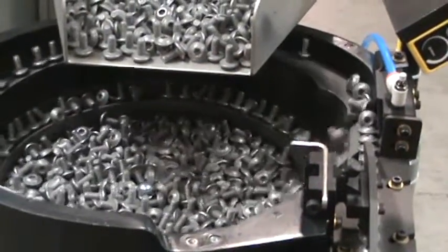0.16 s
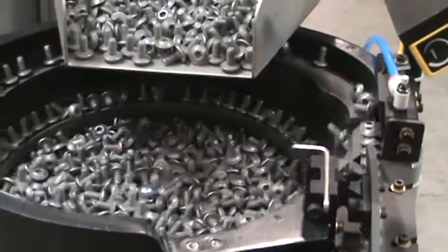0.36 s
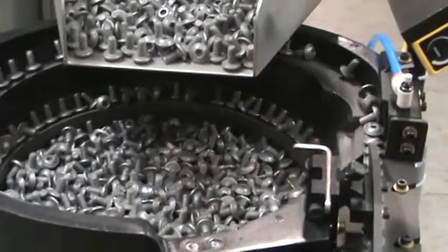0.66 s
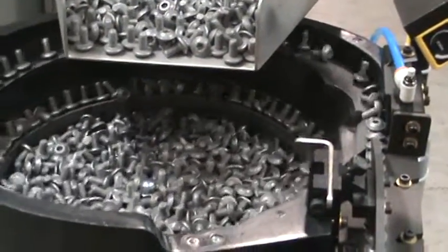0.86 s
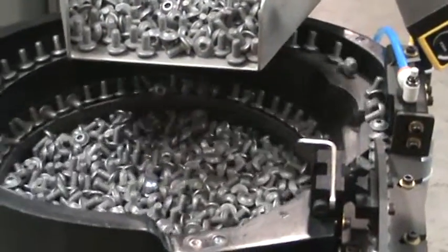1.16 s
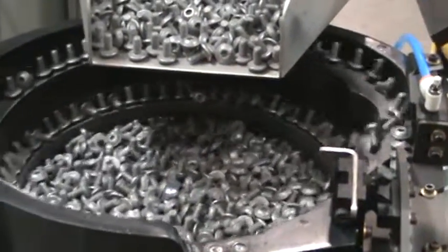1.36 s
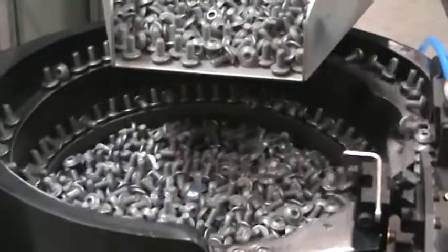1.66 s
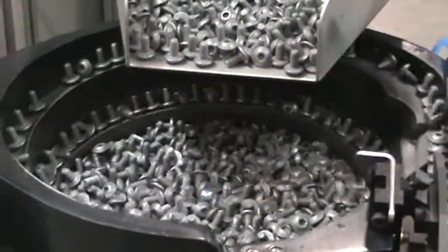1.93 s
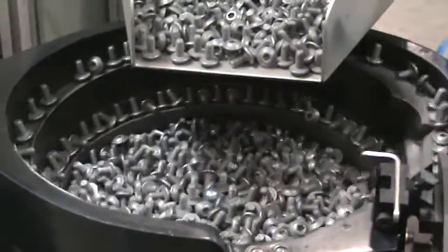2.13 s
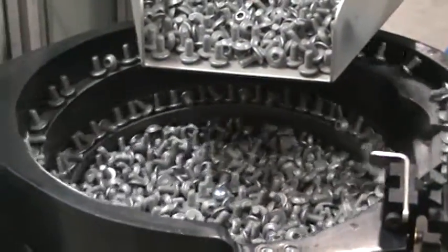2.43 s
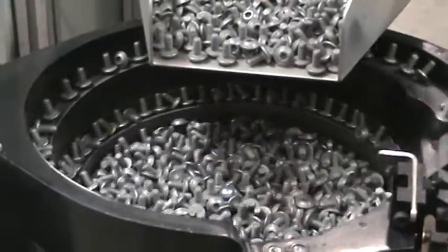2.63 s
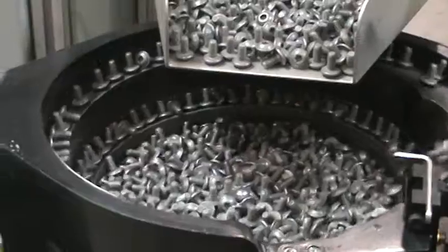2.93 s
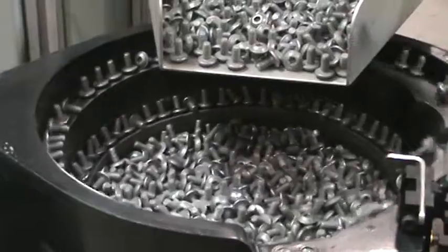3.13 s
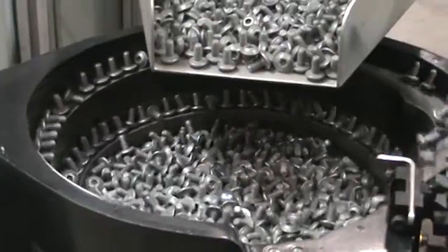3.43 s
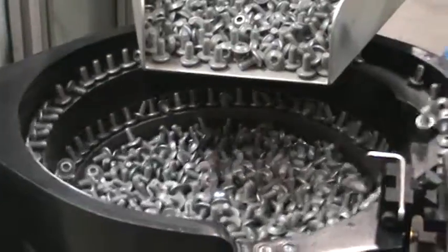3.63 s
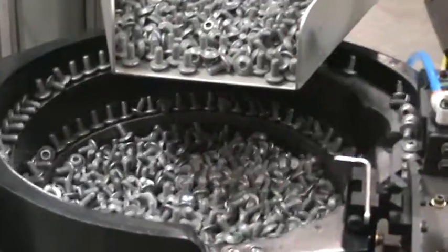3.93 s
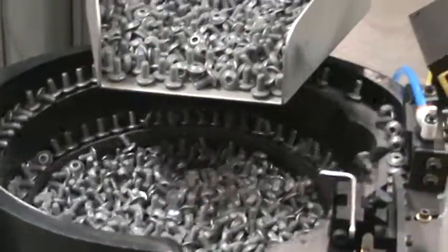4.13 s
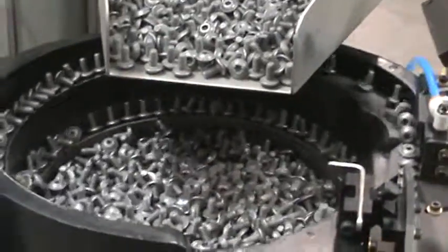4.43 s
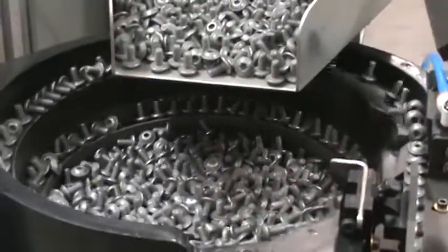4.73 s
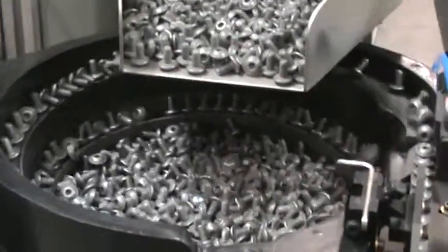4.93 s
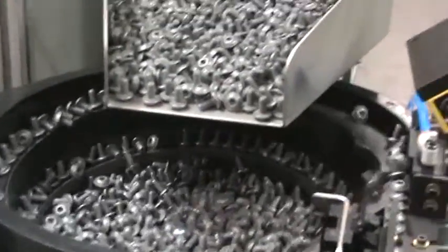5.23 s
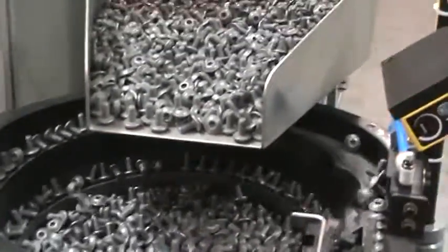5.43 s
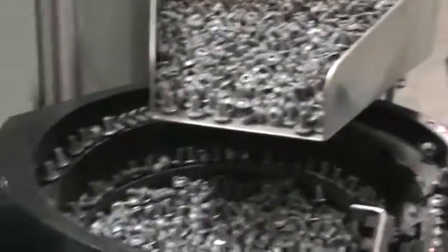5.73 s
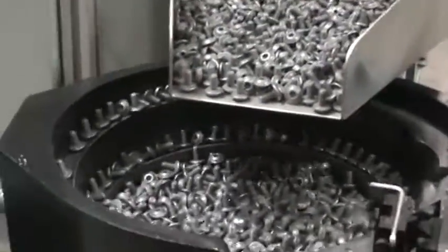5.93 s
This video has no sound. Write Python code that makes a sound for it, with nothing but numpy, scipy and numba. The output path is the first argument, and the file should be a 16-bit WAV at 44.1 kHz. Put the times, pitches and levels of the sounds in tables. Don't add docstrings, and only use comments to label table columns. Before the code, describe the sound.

A vibrating bowl of steel screws runs throughout, heard close in stereo: a dense, bright metallic sizzle over low mains hum and broad workshop rumble. At 0 seconds a loud air jet is already open, fading by about 0.5, with weaker hisses just after. A longer soft hiss swells from 1.3 to 1.8. At 1.77 a valve exhausts with a sudden piercing, high whistle, sinking slightly and breaking into airy hiss within about a quarter second; a cylinder thuds and bounces at 2.0. The rattle ducks under the whistle, then returns, somewhat lighter. A neighbouring machine whirs faintly in spells. A dry tick comes at 2.95, a sharp air puff with a soft tail at 3.3, and faint puffs at 4.1 and 4.3. A second, slightly weaker whistle bursts at 4.77, with a softer, ringing landing around 5.0. A broad clack sounds at 5.4; rattle and hum continue to the end, near 6.

```python
import sys
import numpy as np
from scipy import signal
from scipy.fft import rfft, irfft, next_fast_len
from scipy.io import wavfile
from scipy.ndimage import uniform_filter1d
from numba import njit

SR = 44100
rng = np.random.default_rng(int(sys.argv[2]) if len(sys.argv) > 2 else 0)


def master(y):
    cut = np.clip(np.atleast_2d(y).T, -1, 1)
    pcm = np.round(cut * 32767)
    wavfile.write(sys.argv[1], SR, pcm.astype(np.int16))


def makeup_ratio(level_db):
    decades = np.asarray(level_db, float) / 20
    return 10 ** decades


N = 268569

# frequency [Hz], density [dB per Hz].
RUMBLE_SPECTRUM = [(20, -19), (40, -7.5), (60, -2), (90, -3), (150, -0.5), (200, -7), (320, -13.5),
                   (450, -5.5), (560, 4), (650, -0.5), (800, -14.5), (1200, -17)]
# frequency [Hz], density [dB per Hz].
HANDLING_SPECTRUM = [(20, 2), (60, -2), (90, -28)]
RUMBLE_DB, RUMBLE_FOLLOWS, MEAN_LOAD_DB = -38.5, 0.88, -26

# frequency [Hz], density [dB per Hz].
NEIGHBOUR_SPECTRUM = [(150, -11), (250, 1.5), (400, -4.5), (700, -7), (1100, 0.5), (1800, -0.5),
                      (2500, 1.5), (4000, -18), (6000, -35)]
# start [s], length [s], level [dB].
SPELLS = [(.3, 1.1, -46), (1.5, 0.24, -41), (2.303, 0.78, -44), (3.32, 0.33, -40.5), (3.7, .4, -43.5),
          (4.14, 0.61, -37.5), (5.295, 1., -42)]
NEIGHBOUR_HZ, SPELL_RISE_S, SPELL_FALL_DB_S = 1097, 0.3, 150

# start [s], rise [s], hold [s], level [dB], centre [Hz].
JETS = [
    (-.2, 0.074, 0.39, -18.5, 6550),
    (.22, 0.076, 0.077, -25.5, 4600),
    (.5, .08, .12, -30.5, 5700),
    (1.31, 0.095, 0.37, -28, 5600),
    (1.35, .35, .07, -30, 4860),
    (3.313, 0.009, 0.06, -25.5, 5730),
    (3.383, 0.069, 0.25, -33, 5700),
    (4.077, 0.026, 0.055, -34.5, 6000),
    (4.33, 0.035, .04, -34, 6000),
]
JET_FALL_DB_S, LEAK_DB, LEAK_HZ, LEAK_WIDTH_HZ = 66, -38, 6000, 1330
NARROW_HZ, NARROW_DB, WIDEN_HZ_PER_DB = 600, -29.5, 260
TAIL_HZ = 5600

# time [s], level [dB], ring [share of frame t60],
# tilt [dB per octave].
THUDS = [
    (1.977, -25.5, .6, -2),
    (2.004, -31, 0.9, 1.5),
    (4.958, -36, 1, -3),
    (5.004, -32, 1.64, -0.6),
]
# lowest [Hz], highest [Hz], level [dB], t60 [s], left-right difference [dB].
FRAME = [(131, 172, -5.5, 0.35, -9), (260, 317, -3, 0.28, -12), (443, 580, 1.5, 0.14, -4),
         (790, 1040, -3, 0.21, -4), (1300, 1640, -3.5, 0.38, -1), (1800, 3300, 3, 0.3, 0)]
# time [s], level [dB], t60 [s], lowest [Hz], highest [Hz].
KNOCKS = [
    (2.955, -30, .069, 1670, 2080),
    (4.2, -41.5, 0.19, 233, 279),
    (4.7, -40, 0.87, 225, 256),
    (5.099, -42, .15, 2150, 2500),
    (5.41, -26, 0.15, 1500, 10000),
]
KNOCK_SIDE_DB = -21

# start [s], whistle [dB], hiss [dB].
EXHAUSTS = [
    (1.768, -5, -13),
    (4.765, -8, -13.5),
]
# frequency [Hz], density [dB per Hz].
SPRAY_SPECTRUM = [(1500, -17), (3000, -8.5), (5000, -4.5), (7500, -25), (8600, -1.5), (9550, 3.5),
                  (10600, -6), (12000, -11.5)]
OPEN_S, SURGE_DB, SURGE_S = 0.0054, 4.5, 0.019
TONE_HOLD_S, TONE_SAG_DB_S, TONE_FALL_DB_S = 0.18, 41.5, 59
TONE_HZ, TONE_START_HZ, SETTLE_S = 7000, 7320, 0.094
TONE_WIDTH_HZ, BREAKUP_HZ_S, STEADY_S = 58, 2000, 0.11
HISS_RISE_S, HISS_HOLD_S, HISS_SAG_DB_S, HISS_FALL_DB_S = 0.022, 0.19, 19, 96
HISS_TOP_HZ, EDGE_START_HZ, EDGE_END_HZ, EDGE_SINK_HZ_S = 7480, 7220, 4800, 9400

# multiple of the mains, level [dB rms].
HUM_LINES = [(1, -55.5), (2, -37.5), (4, -57), (5, -65), (6, -50.5), (7, -51), (8, -38), (9, -54),
             (10, -44.5), (14, -60.5), (18, -56)]
MAINS_HZ = 60

# frequency [Hz], density [dB per Hz].
RATTLE_SPECTRUM = [(400, -20), (700, -12), (886, -5), (1080, -2), (1230, -4), (2240, -0.5), (3280, -1.5),
                   (4490, 0.5), (5760, 1.5), (6320, 2), (8760, -0.5), (9600, 3.5), (11000, -4.5),
                   (16000, -4)]
# frequency [Hz], density [dB per Hz].
RATTLE_SIDE_SPECTRUM = [(59, -39), (100, -33), (202, -13.5), (1450, -9.5), (2170, -6), (5190, -8),
                        (6560, -18), (7140, -31), (7770, -12), (11200, 1.5), (16000, -15)]
# frequency [Hz], width [Hz], level [dB].
BOWL_MODES = [(1155, 28, -2), (1766, 59, 3.5), (2287, 39, 4.5), (4650, 120, -14), (5700, 56, 0.5),
              (6680, 55, -46), (7300, 180, -20), (8800, 86, -8), (9560, 230, 2.5)]
# time [s], level [dB].
LOAD = [(0, -22), (.4, -24), (.9, -24.5), (1.3, -24), (1.8, -22.5), (2.3, -27), (3.28, -26.5), (3.34, -25),
        (3.8, -25), (4.1, -25), (4.76, -24.5), (5.3, -27.5), (6.1, -27)]
SIDE_DB = -5.5

# frequency [Hz], gain [dB].
PORTS = [(9800, 4.5), (11000, 3), (12000, -4.5), (12700, -8), (13300, -9), (14000, -10), (15000, 3),
         (15750, 3)]
LIMIT_DB, SQUEEZE, RELEASE_DB_S, ATTACK_S = -14, 0.64, 52.5, 0.0009
CUTOFF_HZ = 16050


def at_hz(points, hz):
    point_hz, db = np.transpose(points)
    return np.interp(np.log(hz + 1), np.log(point_hz), db)


def in_time(rows):
    return np.interp(np.arange(N) / SR, *np.transpose(rows))


def since(s):
    return np.maximum(np.arange(N) / SR - s, 0)


def swell(s, rise_s, hold_s, fall_db_s):
    return np.minimum(since(s) / rise_s, 1) * makeup_ratio(-fall_db_s * since(s + rise_s + hold_s))


def rms_one(x):
    return x / np.sqrt(np.mean(x ** 2) + 1e-20)


def colour(x, spectrum, peaks=(), peak_db=0):
    size = next_fast_len(N)
    hz = np.arange(size // 2 + 1) * SR / size
    bumps = sum(makeup_ratio(db + peak_db) ** 2 / (1 + (2 * (hz - mid_hz) / width_hz) ** 2)
                for mid_hz, width_hz, db in peaks)
    gain = makeup_ratio(at_hz(spectrum, hz)) * np.sqrt(1 + bumps)
    return rms_one(irfft(rfft(x, size) * gain, size)[..., :N])


def drift(rate_hz):
    knots_per_s = 40
    knots = rng.standard_normal(int(N / SR * knots_per_s) + 2)
    r = np.exp(-2 * np.pi * rate_hz / knots_per_s)
    smooth = rms_one(signal.filtfilt([1 - r], [1, -r], knots))
    return np.interp(np.arange(N) / SR * knots_per_s, np.arange(len(knots)), smooth)


@njit
def resonate(x, turn, r):
    y = np.zeros(len(x))
    for i in range(2, len(x)):
        drive = np.sqrt((1 - r[i] ** 2) / 2) * (x[i] - x[i - 2])
        y[i] = drive + 2 * r[i] * np.cos(turn[i]) * y[i - 1] - r[i] ** 2 * y[i - 2]
    return y


def whistle(hz, width_hz, count=1):
    x = rng.standard_normal(N)
    width_hz = np.clip(width_hz, 20, 9000)
    for _ in range(count):
        x = resonate(x, 2 * np.pi * hz / SR, np.exp(-np.pi * width_hz / SR))
    return x * (np.pi * width_hz / SR) ** ((count - 1) / 2)


def stereo(mid, side, pan_db=0):
    return np.array([(mid + side) * makeup_ratio(pan_db / 2), (mid - side) * makeup_ratio(-pan_db / 2)])


def rumble(level_db):
    mid, side = colour(rng.standard_normal((2, N)), RUMBLE_SPECTRUM)
    handling = makeup_ratio(-27) * colour(side, HANDLING_SPECTRUM)
    return makeup_ratio(level_db) * stereo(mid, makeup_ratio(-14) * side + handling)


def neighbour():
    mid, side = colour(rng.standard_normal((2, N)), NEIGHBOUR_SPECTRUM)
    tone = makeup_ratio(-11) * whistle(np.full(N, NEIGHBOUR_HZ), np.full(N, 20.))
    spells = [makeup_ratio(db) * swell(s - SPELL_RISE_S, SPELL_RISE_S, length_s, SPELL_FALL_DB_S)
              for s, length_s, db in SPELLS]
    gain = np.max(spells, axis=0) * makeup_ratio(3.0 * drift(4.1))
    return gain * stereo(mid + tone, makeup_ratio(-9) * side + tone)


def jets():
    opening = np.array([swell(s, rise_s, hold_s, JET_FALL_DB_S) for s, rise_s, hold_s, _, _ in JETS])
    table = np.array(JETS)
    db, full_hz = table[:, 3, None], table[:, 4, None]
    power = (makeup_ratio(db) * opening) ** 2
    flow, leak = power.sum(axis=0), makeup_ratio(LEAK_DB) ** 2
    jet_hz = TAIL_HZ + (full_hz - TAIL_HZ) * opening
    hz = (np.sum(power * jet_hz, axis=0) + leak * LEAK_HZ) / (flow + leak)
    flow_db = 10 * np.log10(flow + 1e-12)
    jet_width_hz = NARROW_HZ + WIDEN_HZ_PER_DB * np.maximum(flow_db - NARROW_DB, 0)
    width_hz = (flow * jet_width_hz + leak * LEAK_WIDTH_HZ) / (flow + leak)
    core = whistle(hz, 1.55 * width_hz, count=2) + makeup_ratio(-2.0) * whistle(hz, 6.1 * width_hz)
    side = makeup_ratio(-5.5) * whistle(hz, 2.8 * width_hz)
    flutter = makeup_ratio(0.8 * drift(15))
    out = np.sqrt(flow + leak) * flutter * stereo(core, side, pan_db=1.8)
    return signal.sosfilt(signal.butter(4, [2800, 10800], "band", fs=SR, output="sos"), out)


def thuds():
    out, t = np.zeros((2, N)), np.arange(SR // 2) / SR
    blows = [(*row, KNOCK_SIDE_DB) for row in KNOCKS]
    for s, db, ring, tilt_db in THUDS:
        for low_hz, high_hz, band_db, t60_s, side_db in FRAME:
            blow_db = db + band_db + tilt_db * np.log2(low_hz / 500)
            blows.append((s, blow_db, ring * t60_s, low_hz, high_hz, side_db))
    for s, db, t60_s, low_hz, high_hz, side_db in blows:
        decay = makeup_ratio(-60 * t / t60_s) * (1 - np.exp(-t / 0.00084))
        burst = rng.standard_normal((2, len(t))) * decay
        band = signal.butter(2, [low_hz, high_hz], "band", fs=SR, output="sos")
        mid, side = signal.sosfilt(band, burst)
        gain = makeup_ratio(db) * np.sqrt(SR / 2 / (high_hz - low_hz))
        at = round(s * SR)
        out[:, at:at + len(t)] += gain * stereo(mid, makeup_ratio(min(side_db, -4)) * side, pan_db=7.0)
    return out


def exhaust_whistle(s, db):
    t = since(s)
    hz = TONE_HZ + (TONE_START_HZ - TONE_HZ) * np.exp(-t / SETTLE_S)
    tone = whistle(hz, TONE_WIDTH_HZ + BREAKUP_HZ_S * t, count=2)
    height = np.sqrt(uniform_filter1d(tone ** 2, size=60) + 0.1)
    steady = tone / height ** np.exp(-t / STEADY_S)
    level_db = db + SURGE_DB * np.exp(-t / SURGE_S) - TONE_SAG_DB_S * t
    return makeup_ratio(level_db) * swell(s, OPEN_S, TONE_HOLD_S, TONE_FALL_DB_S) * steady


def exhaust_hiss(s, db):
    t = since(s)
    low_hz = np.clip(EDGE_START_HZ - EDGE_SINK_HZ_S * t, EDGE_END_HZ, HISS_TOP_HZ - 300)
    centre_hz, spread_hz = (HISS_TOP_HZ + low_hz) / 2, 0.96 * (HISS_TOP_HZ - low_hz)
    sprays = colour(rng.standard_normal((2, N)), SPRAY_SPECTRUM)
    spray_gain = makeup_ratio(-1.5) * spread_hz / 3000
    hiss = np.array([whistle(centre_hz, spread_hz, count=2) + spray_gain * spray for spray in sprays])
    return makeup_ratio(db - HISS_SAG_DB_S * t) * swell(s, HISS_RISE_S, HISS_HOLD_S, HISS_FALL_DB_S) * hiss


def exhausts():
    out = 0
    for s, tone_db, hiss_db in EXHAUSTS:
        mid, side = exhaust_hiss(s, hiss_db)
        out = out + stereo(exhaust_whistle(s, tone_db) + mid, makeup_ratio(-5) * side, pan_db=4.0)
    return out


def hum(waver_db=1.23):
    phase = 2 * np.pi * MAINS_HZ * np.arange(N) / SR
    lines = 0
    for k, db in HUM_LINES:
        gain = np.sqrt(2) * makeup_ratio(db + waver_db * (0.5 + 0.035 * k) * drift(3.7))
        lines = lines + gain * np.sin(k * (phase + 0.018 * drift(4.8)) + rng.uniform(0, 2 * np.pi))
    return stereo(lines, makeup_ratio(-26.5) * np.roll(lines, 40))


def rattle(level_db, per_s=9000, spread_db=2.5, throw=0.21, blur_db=0.0):
    bunch = 1 + np.clip(throw, 0, 1) * np.cos(4 * np.pi * MAINS_HZ * np.arange(N) / SR)
    hit = rng.random((2, N)) < per_s * bunch / SR
    force = makeup_ratio(spread_db * np.minimum(rng.exponential(1, (2, N)), 5))
    clicks = hit * force * rng.choice([-1, 1], (2, N))
    mid, side = clicks / clicks.std() + makeup_ratio(blur_db) * rng.standard_normal((2, N))
    mid = colour(mid, RATTLE_SPECTRUM, BOWL_MODES, peak_db=-1.5)
    side = makeup_ratio(SIDE_DB) * colour(side, RATTLE_SIDE_SPECTRUM)
    return makeup_ratio(level_db + 0.86 * drift(13)) * stereo(mid, side)


def scene():
    load_db = in_time(LOAD)
    rumble_db = RUMBLE_DB + RUMBLE_FOLLOWS * (load_db - MEAN_LOAD_DB)
    background = rumble(rumble_db) + neighbour() + jets()
    return background + thuds() + exhausts() + hum() + rattle(load_db)


def band_limit(x):
    return signal.sosfilt(signal.butter(12, 17060, fs=SR, output="sos"), x)


def record(dry):
    size = next_fast_len(N)
    port_gain = makeup_ratio(at_hz(PORTS, np.arange(size // 2 + 1) * SR / size))
    mid = irfft(rfft(dry[0] + dry[1], size) * port_gain, size)[:N]
    heard = stereo(mid / 2, (dry[0] - dry[1]) / 2)
    level_db = 10 * np.log10(uniform_filter1d(np.mean(heard ** 2, axis=0), size=300) + 1e-12)
    climb_db = RELEASE_DB_S * np.arange(N) / SR
    excess_db = SQUEEZE * np.maximum(level_db - LIMIT_DB, 0)
    duck_db = np.maximum.accumulate(excess_db + climb_db) - climb_db
    r = np.exp(-1 / (ATTACK_S * SR))
    gain = makeup_ratio(-signal.lfilter([1 - r], [1, -r], duck_db))
    ducked = 0.61 * np.tanh(heard * gain / 0.93)
    top_cut = signal.cheby2(16, 70, CUTOFF_HZ, fs=SR, output="sos")
    return band_limit(signal.sosfilt(top_cut, ducked))


dry = scene()
out = record(dry)
master(out)
```